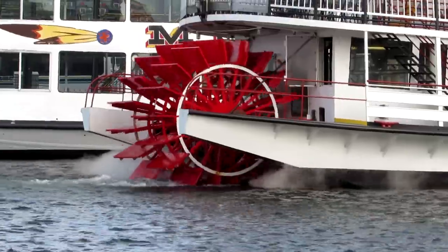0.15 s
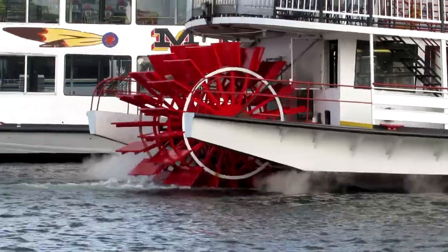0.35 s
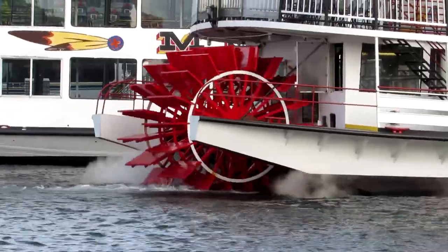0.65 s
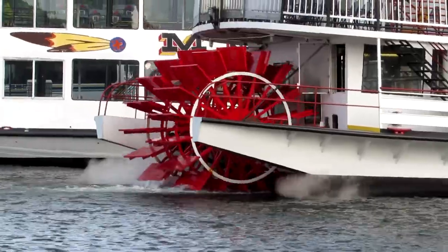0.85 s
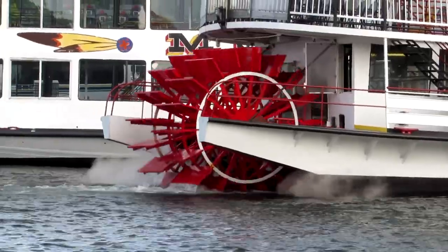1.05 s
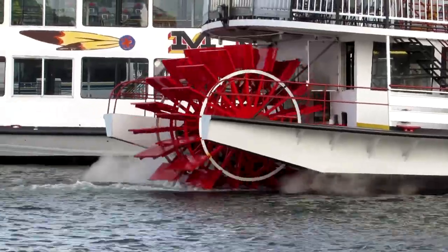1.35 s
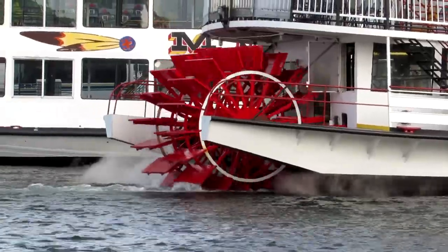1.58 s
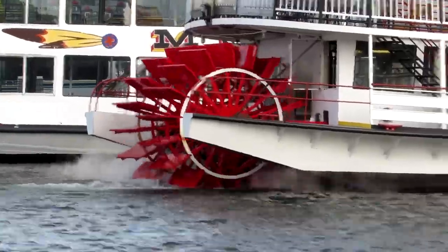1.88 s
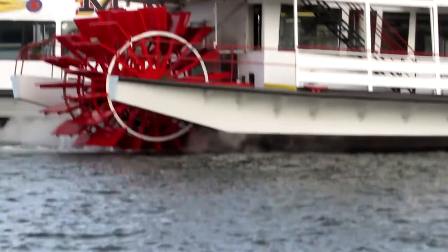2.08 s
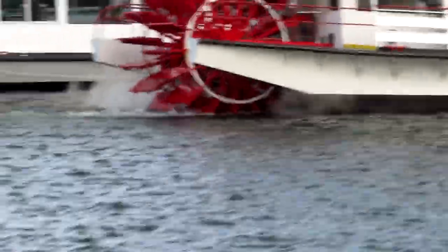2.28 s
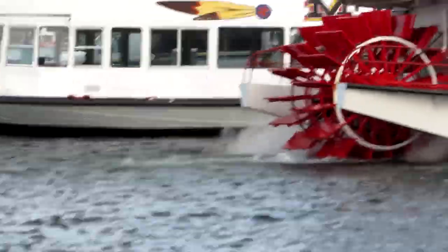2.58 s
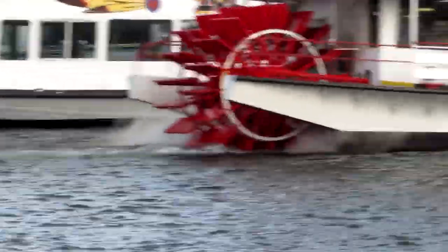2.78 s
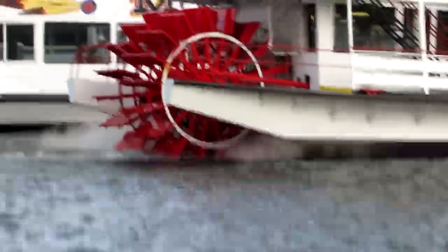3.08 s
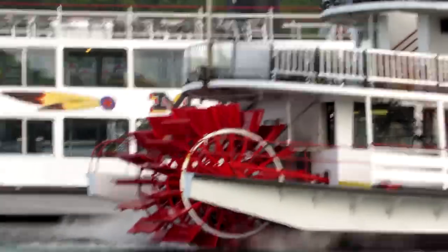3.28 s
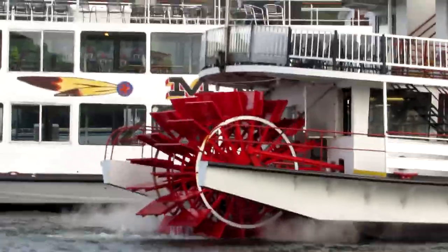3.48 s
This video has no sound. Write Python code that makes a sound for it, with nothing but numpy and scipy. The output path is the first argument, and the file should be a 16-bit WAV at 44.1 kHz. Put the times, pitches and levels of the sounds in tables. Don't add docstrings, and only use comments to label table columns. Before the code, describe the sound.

Wind rumbles and thumps hard against a small hand-held stereo microphone outdoors on open water, almost covering the faint wash of a passing paddlewheel boat; the buffeting weakens in the last half second or so.

```python
import sys
import numpy as np
from scipy import signal
from scipy.io import wavfile
from scipy.ndimage import uniform_filter1d

SR = 44100
rng = np.random.default_rng(int(sys.argv[2]) if len(sys.argv) > 2 else 0)


def waveform_to_disk(signal):
    frames = np.transpose(np.atleast_2d(signal))
    scaled = np.clip(frames, -1, 1) * 32767
    samples = np.round(scaled).astype(np.int16)
    wavfile.write(sys.argv[1], SR, samples)


def gain_from_decibels(decibels):
    exponent = np.asarray(decibels, float) / 20
    return 10 ** exponent


N = 160524
TIME_S = np.arange(N) / SR
OPPOSED = np.array([[1], [-1]])
START_S = 0.0765

PORT_LOW_HZ, SKIRT_HZ = 76, 781

# time in seconds, level in dB, sharp edge noise against it in dB.
WIND_GUSTS = [(.08, -16.5, -62), (.3, -16.5, -44), (.56, -17, -45), (.62, -17, -28), (.85, -14.5, -33.5),
              (1.1, -19, -33), (1.16, -22, -37), (1.35, -19, -39), (1.5, -17, -44), (1.8, -17, -45),
              (2.0, -20.5, -53), (2.35, -18.5, -42), (2.42, -23.5, -43), (2.6, -19.5, -47),
              (2.85, -24.5, -44), (2.95, -29.5, -38), (3.3, -29, -40), (3.64, -30, -43)]

# centre in seconds, half length in seconds, change in dB.
WIND_HOLES = [(0.452, 0.021, -6), (0.603, 0.0075, -6), (.72, 0.025, -1.5), (0.822, .012, -3),
              (0.908, 0.011, -4), (0.955, 0.026, -1), (1.14, 0.011, -5), (1.357, 0.0067, -2),
              (1.539, 0.012, -1.5), (1.75, 0.0069, 0.5), (1.823, 0.0064, -3), (2.091, 0.0067, -13),
              (2.195, .01, 0), (2.394, 0.0099, -1), (2.575, 0.0053, 1.5), (2.712, .008, -5),
              (2.9, 0.0078, -9.5), (2.971, 0.011, -3.5)]

# crest in seconds, peak in
# dB, sharpness against the peak in dB, pitch in Hz.
PUSHES = [(0.079, -3, -33, 302), (0.186, -2.5, -42, 269), (0.259, -8, -50, 269), (0.277, -13, -47, 250),
          (0.344, -6, -33, 264), (0.486, -6, -46, 169), (0.502, -8, -37, 240), (0.534, -6, -54, 250),
          (0.625, -12.5, -24, 217), (0.645, -15, -26, 350), (0.753, -8, -18.5, 336),
          (0.837, -5.5, -43, 230), (0.886, -12, -22, 290), (0.926, -6.5, -33, 230),
          (0.979, -10.5, -40, 270), (1.012, -2.5, -51, 204), (1.171, -14, -45, 285), (1.248, -18, -37, 300),
          (1.402, -8.5, -42, 141), (1.417, -6.5, -27, 200), (1.44, -7.5, -44, 250), (1.492, -9, -33, 250),
          (1.59, -3.5, -47, 264), (1.716, -3.5, -48, 166), (1.791, -7, -29, 230), (1.907, -2.5, -35, 310),
          (2.006, -4, -56, 176), (2.036, -8.5, -24, 348), (2.052, -10.5, -31, 380), (2.121, -4.5, -49, 187),
          (2.24, -3, -23, 280), (2.32, -7.5, -26, 262), (2.354, -3.5, -46, 273), (2.542, -7, -51, 237),
          (2.588, -8.5, -44, 207), (2.717, -14.5, -30, 370), (2.836, -10.5, -41, 307),
          (2.918, -9, -44, 302), (2.942, -18.5, -38, 350), (2.989, -14.5, -23, 375),
          (3.014, -11.5, -27, 248), (3.038, -16.5, -47, 360), (3.092, -19, -44, 308),
          (3.193, -16, -34, 230), (3.237, -18.5, -38, 250), (3.281, -17, -38, 298), (3.319, -17, -43, 220),
          (3.336, -19.5, -31, 276), (3.421, -16, -35, 354), (3.436, -14.5, -45, 257),
          (3.492, -17, -47, 243),
    (3.527, -15, -37, 310),
    (3.543, -14, -52, 310),
    (3.583, -11.5, -47, 253),
    (3.632, -19, -32, 280),
]


# crest in seconds, peak in dB,
# sharpness against the peak in dB, pitch in Hz.
PULLS = [(0.116, -2, -30, 217), (0.322, -4.5, -51, 274), (0.37, -6.5, -35, 288), (0.403, -2.5, -40, 274),
         (0.423, -2, -44, 263), (0.452, -12, -51, 270), (0.563, -2.5, -28, 288), (0.664, -13.5, -35, 340),
         (0.688, -21, -26, 213), (0.781, -5.5, -31, 186), (0.794, -7.5, -39, 219), (1.116, -4, -27.5, 276),
         (1.203, -7, -40, 268), (1.218, -12, -25, 378), (1.267, -15, -41, 194), (1.284, -11.5, -45, 307),
         (1.343, -18, -22, 193), (1.37, -8.5, -21, 200), (1.518, -12, -44, 210), (1.609, -7, -44, 240),
         (1.653, -7, -47, 230), (1.775, -5.5, -42, 210), (2.019, -4, -44, 178), (2.178, -9, -41, 297),
         (2.211, -8, -31, 265), (2.301, -8, -36, 320), (2.368, -9.5, -40, 302), (2.644, -4, -39, 251),
         (2.755, -7.5, -45, 250), (2.787, -7, -40, 287), (2.817, -2, -40, 293), (3.117, -16, -36, 340),
         (3.134, -13, -36, 250), (3.213, -16.5, -46, 290), (3.401, -19, -39, 276), (3.557, -15, -39, 255),
         (3.609, -18.5, -43, 352),
         (.088, 1.5, -39, 230),
    (2.661, -12, -45, 260),
    (2.694, -8.5, -45, 270),
    (2.881, -10.5, -34, 370),
    (3.058, -17.5, -38, 325),
]


# time in seconds, peak in dB.
EDGE_FLICKS = [(.557, -38), (0.785, -29), (1.379, -35), (1.444, -40), (1.875, -34), (.638, -30),
               (.672, -38), (.748, -30), (2.607, -33.5), (2.642, -46), (2.057, -36), (2.299, -35),
               (3.108, -49), (3.134, -51)]

# time in seconds, spray level in dB, deeper churn against it in dB.
WHEEL_RUSH = [(0.08, -48, -2), (0.115, -53.5, -2.5), (0.14, -55.5, -1.5), (0.19, -57, -2),
              (0.52, -60.5, -3.5), (0.54, -58.5, -2), (0.6, -64.5, -3), (0.83, -62, 0), (1.21, -66.5, 1),
              (1.36, -60, -1.5), (1.74, -59, 0), (1.99, -65, 0), (2.19, -61.5, -1), (2.38, -67.5, 0),
              (2.8, -67.5, 3), (2.85, -68.5, 0), (3.53, -67, 3), (3.64, -64.5, 0.5)]

# frequency in Hz, density in dB per Hz.
WASH_SPECTRUM = [(600, -22), (850, -0.5), (1400, -6), (1750, -8.5), (2400, -11.5), (3300, -15.5),
                 (9000, -19.5), (12500, -28)]

# frequency in Hz, correlation of left and right from 0 to 1.
PORT_LIKENESS = [(1500, .985), (3000, .972), (6400, .83), (13000, .4)]

# frequency in Hz, width in Hz, height in dB.
HOUSING_MODES = [(1372, 295, 9), (1700, 130, -4), (2363, 820, 10.5), (3000, 86, 4), (4750, 300, -1.5),
                 (4980, 180, 8.5), (5640, 210, 5.5), (6270, 480, 7), (7080, 300, 5), (7850, 360, 6),
                 (8300, 190, 4), (9020, 640, 9.5), (9260, 250, -6), (10060, 520, 7.5)]

# frequency in Hz, level in dB, 60 dB decay in seconds.
CASE_MODES = [
    (6150, 1, 0.02),
    (1950, 4, .04),
    (2640, -5, 0.06),
]

# start in seconds, length in seconds, first pitch in Hz, last pitch in Hz, level in dB.
BUBBLES = [
    (2.882, .010, 880, 930, -52),
    (2.888, .012, 1150, 1080, -58),
    (2.897, .007, 1350, 1600, -58),
]


def rms_one(x):
    return x / np.sqrt(np.mean(x ** 2) + 1e-20)


def in_time(rows):
    s, *columns = np.transpose(rows)
    return [np.interp(TIME_S, s, c) for c in columns]


def at_hz(points, hz):
    table_hz, value = np.transpose(points)
    return np.interp(np.log(hz), np.log(table_hz), value)


def drift(rate_hz):
    r = np.exp(-40 * np.pi * rate_hz / SR)
    white = rng.standard_normal(N // 20 + 2002)
    slow = signal.lfilter([1], [1, -2 * r, r * r], white)[2000:]
    return np.interp(np.arange(N) / 20, np.arange(len(slow)), rms_one(slow))


def cut(x, hz, kind, order=2):
    return signal.sosfilt(signal.butter(order, hz, kind, fs=SR, output="sos"), x)


def cut_in_phase(x, hz, kind, order):
    return signal.sosfiltfilt(signal.butter(order, hz, kind, fs=SR, output="sos"), x)


def bell(x, hz, width_hz, db):
    a, w = np.sqrt(gain_from_decibels(db)), 2 * np.pi * hz / SR
    k = np.sin(w) * width_hz / hz / 2
    zeros = [1 + k * a, -2 * np.cos(w), 1 - k * a]
    poles = [1 + k / a, -2 * np.cos(w), 1 - k / a]
    return signal.lfilter(zeros, poles, x)


def port_cavity(x):
    low = cut(x, PORT_LOW_HZ, "high")
    low = cut(low, 313, "low", order=3)
    low = cut(low, SKIRT_HZ, "low", order=6)
    low = bell(low, hz=250, width_hz=600, db=-0.5)
    null_hz, null_width_hz = 708, 415
    return signal.lfilter(*signal.iirnotch(null_hz, null_hz / null_width_hz, SR), low)


def port_edge(x):
    return cut(cut(x, 995, "high", order=4), 837, "low", order=6)


def buffets():
    pushes = PUSHES
    rows = np.array(pushes + PULLS)
    sense = np.where(np.arange(len(rows)) < len(pushes), 1, -1)
    half = 900
    t = np.arange(-half, half + 1) / SR
    swing, left = np.zeros(N + 2 * half), np.ones(N + 2 * half)
    for (s, db, _, hz), sign in zip(rows, sense):
        rise_cycles, fall_cycles = 0.56, 0.75
        cycles = t * hz / np.where(t < 0, rise_cycles, fall_cycles)
        span = slice(int(s * SR), int(s * SR) + len(t))
        swing[span] += sign * gain_from_decibels(db - 1.5) * np.exp(-cycles ** 2) * np.cos(2 * np.pi * hz * t)
        cleared_share, cleared_s = 0.6, 0.0042
        left[span] *= 1 - cleared_share * np.exp(-(t / cleared_s) ** 2)
    swing = cut_in_phase(swing, [PORT_LOW_HZ / 2, SKIRT_HZ], "band", order=6)
    return rows, swing[half:N + half], left[half:N + half]


def flicks(s, peak_db):
    impulse = np.eye(1, 4000)[0]
    ring = cut(port_edge(impulse), 1300, "low", order=6)
    crest = np.abs(ring).argmax()
    hits = np.zeros(N)
    hits[(s * SR).astype(int) - crest] = gain_from_decibels(peak_db) * (-1) ** np.arange(len(s))
    return signal.fftconvolve(hits, ring / np.abs(ring).max())[:N]


def wind():
    level_db, edge_db = in_time(WIND_GUSTS)
    level_db = level_db + sum(db * np.exp(-((TIME_S - s) / half) ** 2) for s, half, db in WIND_HOLES)

    quick = drift(58.5)
    quick = np.minimum(quick - uniform_filter1d(quick, int(0.12 * SR)), 1.3)
    lumps = gain_from_decibels(3 * quick + 0.97 * drift(3.4))
    deep_lumps = lumps ** 0.71
    white = rng.standard_normal((2, N))

    rows, side, left = buffets()
    side = side + flicks(rows[:, 0], rows[:, 1] + rows[:, 2])
    side += flicks(*np.transpose(EDGE_FLICKS))

    deep = cut(white[0], 230, "low", order=1)
    size_db = 2.5 * drift(8.9)
    eddies = deep_lumps * deep * gain_from_decibels(size_db) + lumps * (white[0] - deep) * gain_from_decibels(-size_db)
    side += left * gain_from_decibels(level_db) * rms_one(port_cavity(eddies))
    rough = lumps * gain_from_decibels(3 * drift(60)) * white[0]
    side += gain_from_decibels(level_db + edge_db) * rms_one(port_edge(rough))

    leak_rise_hz = 755
    rise = np.diff(side, prepend=0) * SR / (2 * np.pi * leak_rise_hz)
    mid = gain_from_decibels(-13.5) * cut_in_phase(side + rise, 125, "high", order=2)
    common = cut(port_cavity(deep_lumps * white[1]), 200, "low")
    mid += gain_from_decibels(level_db - 18) * rms_one(common)

    opens_s = 0.002
    opens = np.sin(np.pi / 2 * np.clip((TIME_S - START_S) / opens_s, 0, 1)) ** 2
    return opens * (mid + side * OPPOSED)


def wheel(patchy_db, shared_db):
    level_db, churn_db = in_time(WHEEL_RUSH)
    paddles_per_s = 1.5
    level_db = level_db + 0.77 * np.sin(2 * np.pi * paddles_per_s * TIME_S)

    drops_per_s = 500
    drops = gain_from_decibels(2.4 * np.minimum(rng.exponential(1, N), 5))
    drops *= (rng.random(N) < drops_per_s / SR) * rng.choice([-1, 1], N)
    white = rng.standard_normal((2, 2, N))
    white[:, 0] += gain_from_decibels(-22) * rms_one(drops)

    out, together = 0, drift(6)
    edges_hz = 500 * 2 ** np.arange(0, 5.1, 1 / 3)
    for k, (low, high) in enumerate(zip(edges_hz, edges_hz[1:])):
        mid, side = cut(white[k % 2], [low, high], "band")
        hz = np.sqrt(low * high)
        alike = np.clip(at_hz(PORT_LIKENESS, hz), 0, 0.999)
        gain = gain_from_decibels(at_hz(WASH_SPECTRUM, hz) + shared_db * together + patchy_db * drift(18))
        if hz < 2900:
            gain *= gain_from_decibels(churn_db - churn_db.mean())
        out = out + gain * (np.sqrt(1 + alike) * mid + np.sqrt(1 - alike) * side * OPPOSED)
    for hz, width_hz, db in HOUSING_MODES:
        out = bell(out, hz, width_hz, 0.64 * db)
    return gain_from_decibels(7 + level_db) * rms_one(cut(out, 12850, "low", order=6))


def case_tick():
    age = np.maximum(TIME_S - 0.859, 0)
    tick = sum(gain_from_decibels(db - 60 * age / t60) * np.sin(2 * np.pi * hz * age) for hz, db, t60 in CASE_MODES)
    return tick * gain_from_decibels(-62 + 8 * OPPOSED)


def bubbles():
    out = np.zeros((2, N))
    for s, length_s, from_hz, to_hz, db in BUBBLES:
        u = np.clip((TIME_S - s) / length_s, 0, 1)
        cycles = length_s * (from_hz * u + (to_hz - from_hz) * u ** 2 / 2)
        rough = gain_from_decibels(db + 6 * drift(190))
        out += rough * np.sin(np.pi * u ** 0.61) * np.sin(2 * np.pi * cycles)
    splash_s, splash_length_s = 2.879, 0.028
    u = np.clip((TIME_S - splash_s) / splash_length_s, 0, 1)
    froth = rms_one(cut(rng.standard_normal(N), [700, 1650], "band"))
    return out + gain_from_decibels(-54) * np.sin(np.pi * np.sqrt(u)) * froth


def scene():
    return wind() + wheel(patchy_db=0.83, shared_db=0.71) + case_tick() + bubbles()


def roll_off(x):
    return signal.sosfilt(signal.butter(12, 14600, fs=SR, output="sos"), x)


def record(dry):
    x = dry * np.clip((TIME_S - START_S) / 0.00051, 0, 1)
    top = 0.96
    x = x / (1 + np.abs(x / top) ** 6) ** (1 / 6)
    return roll_off(x)


dry = scene()
out = record(dry)
waveform_to_disk(out)
```